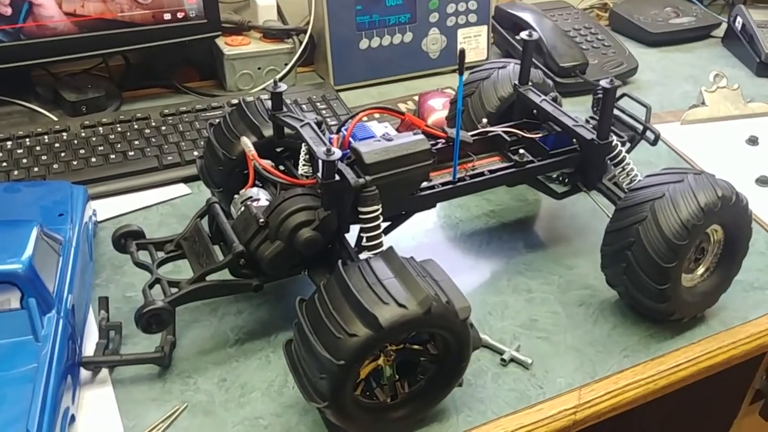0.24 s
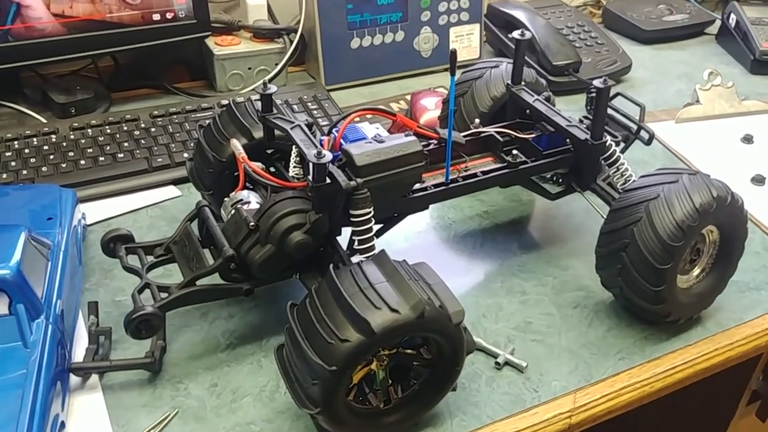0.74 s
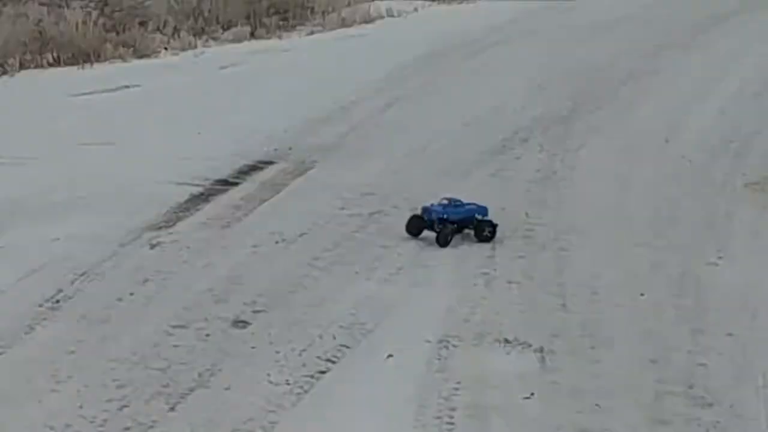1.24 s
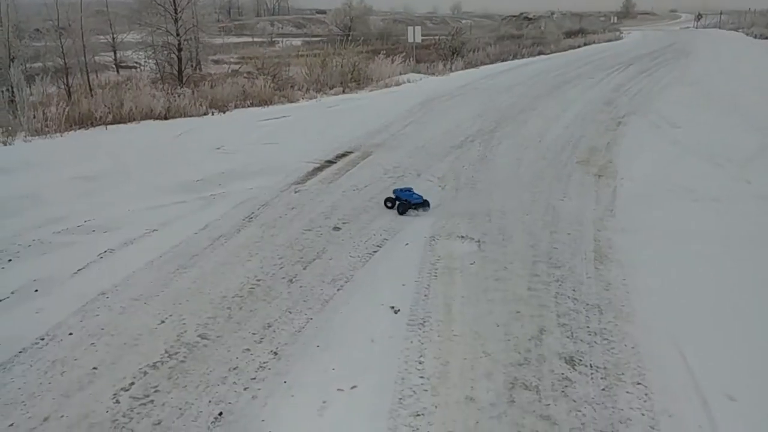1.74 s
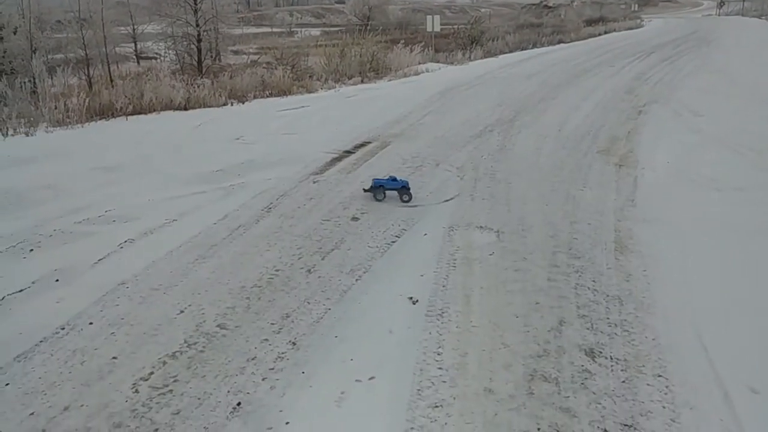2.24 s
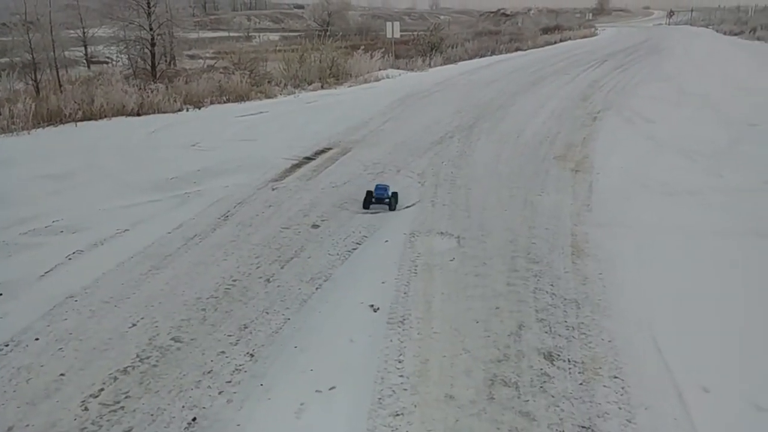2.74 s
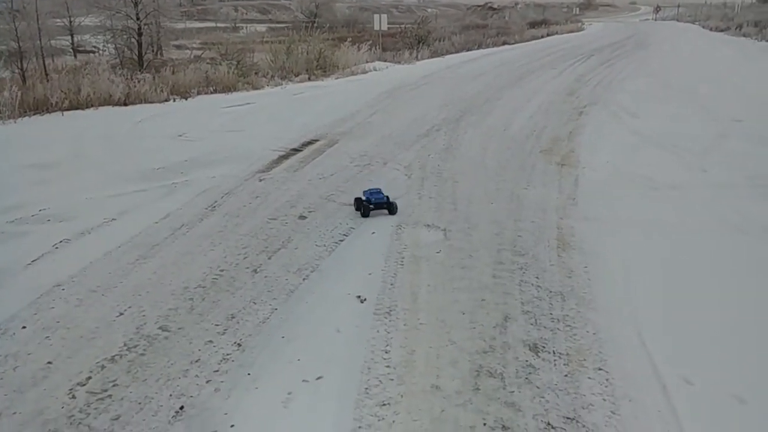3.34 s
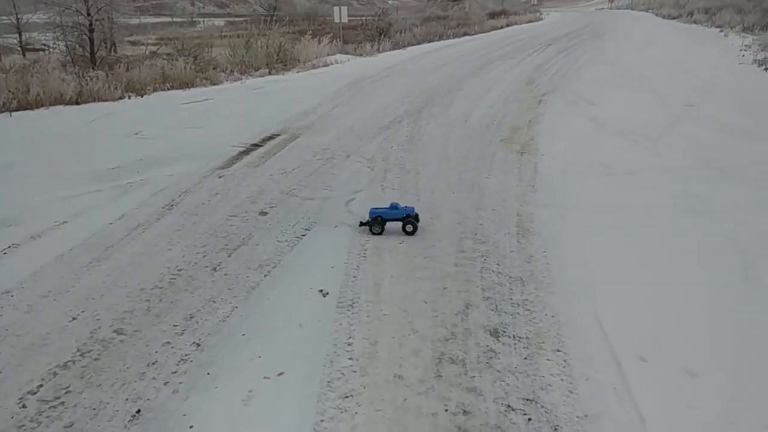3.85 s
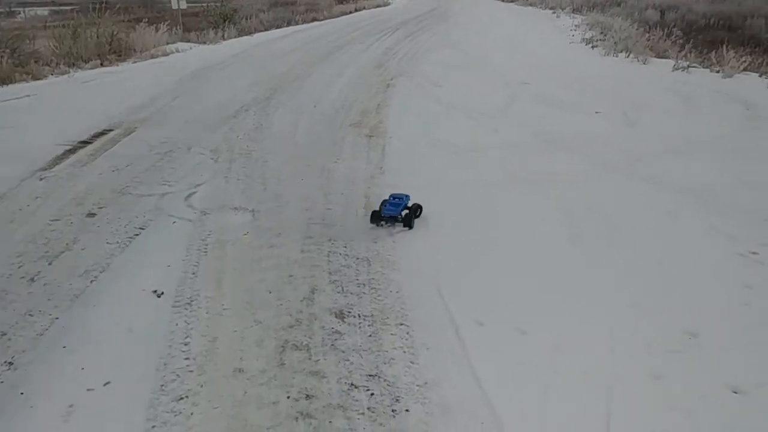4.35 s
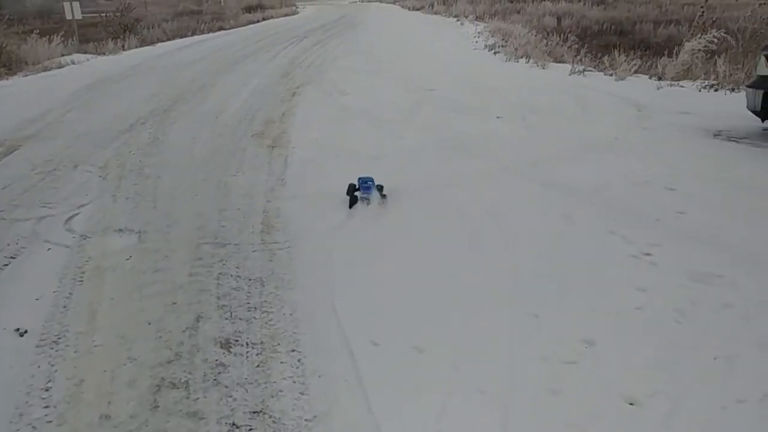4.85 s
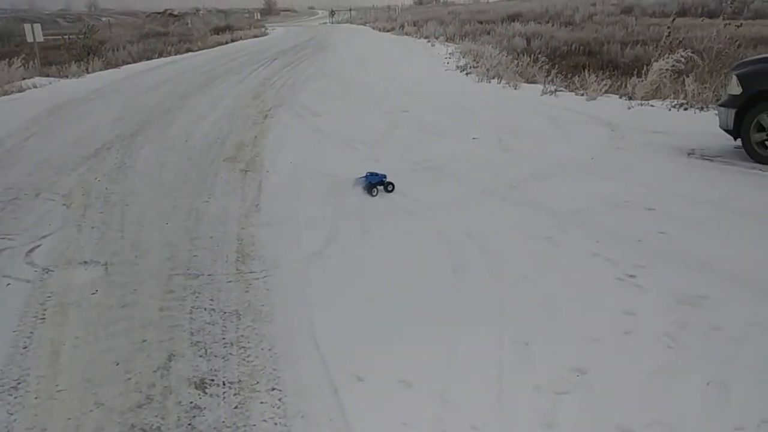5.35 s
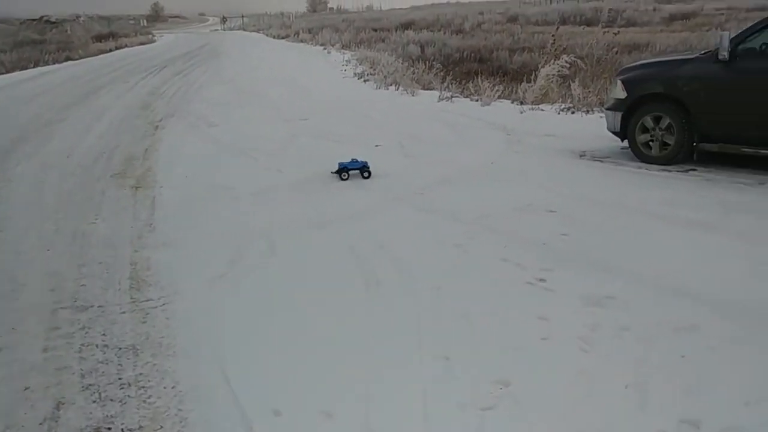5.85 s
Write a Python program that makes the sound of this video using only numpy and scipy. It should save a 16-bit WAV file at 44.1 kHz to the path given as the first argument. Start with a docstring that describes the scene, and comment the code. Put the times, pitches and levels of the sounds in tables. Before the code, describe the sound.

A small remote-controlled truck whines and rasps over snow in repeated throttle bursts, with a low engine idle and light wind rumble.

```python
"""A workshop hums around a radio-controlled truck on the bench, with a brief squeak and faint clicks.
Just before one second the scene changes to packed snow, where the truck races in bursts of throttle.
Its meshing gears whine and rasp in their plastic case; paddle tyres slap, churn and fling the snow,
and bumps set the shell drumming. All the while a parked pickup idles nearby and a little wind
rumbles on the microphone. Toward the end the truck slows and grows quieter."""
import sys
import numpy as np
from scipy import signal
from scipy.fft import rfft, irfft, next_fast_len
from scipy.io import wavfile
from scipy.ndimage import uniform_filter1d

SR = 44100
rng = np.random.default_rng(int(sys.argv[2]) if len(sys.argv) > 2 else 0)


def transcribe(u):
    """Save the signal u as a 16-bit wav file named by the first command-line argument.

    u: samples, shape (n,) or (channels, n), limited to [-1, 1]; the rate is SR.
    q: integer samples, one column per channel.
    """
    v = np.clip(np.atleast_2d(u).T, -1, 1)
    q = np.round(v * 32767).astype(np.int16)
    wavfile.write(sys.argv[1], SR, q)


N = 268172
TIME = np.arange(N) / SR
FFT_SIZE = next_fast_len(N + 4096, True)
FREQS = np.maximum(np.fft.rfftfreq(FFT_SIZE, 1 / SR), 1)


def from_db(db):
    """Amplitude grows tenfold for every 20 dB."""
    return 10 ** (np.asarray(db) / 20)


def rms_one(x):
    """Normalisation to unit power."""
    return x / np.sqrt(np.mean(x ** 2) + 1e-20)


def at_hz(points):
    """Interpolation of a spectrum on a log-frequency axis."""
    hz, value = np.transpose(points)
    return np.interp(np.log(FREQS), np.log(hz), value)


def lift_db(modes):
    """Resonance: each mode adds a Lorentzian peak or dip to a spectrum in dB."""
    return sum(db / (1 + (2 * (FREQS - hz) / width) ** 2) for hz, width, db in modes)


def filtered(x, response):
    """Linear filtering multiplies the spectrum by a frequency response."""
    return irfft(rfft(x, FFT_SIZE) * response, FFT_SIZE)[:N]


def coloured(x, spectrum_db):
    """Source and filter: an excitation takes on a spectrum, at unit power."""
    return rms_one(filtered(x, from_db(spectrum_db)))


def drift(rate_hz):
    """Low-passed noise gives a random fluctuation of unit spread."""
    pole = np.exp(-2 * np.pi * rate_hz * 16 / SR)  # one draw every 16 samples
    slow = signal.lfilter([1], [1, -2 * pole, pole * pole], rng.standard_normal(N // 16 + 1002))[1000:]
    return np.interp(np.arange(N) / 16, np.arange(len(slow)), rms_one(slow))


def grains(per_s, spread_db):
    """Shot noise: tiny impacts of uneven size at random times."""
    sizes = from_db(spread_db * np.minimum(rng.exponential(1, N), 4))
    return rms_one((rng.random(N) < per_s / SR) * sizes * rng.choice([-1, 1], N))


def angle(hz):
    """Phase is the integral of frequency."""
    return 2 * np.pi * np.cumsum(hz * np.ones(N)) / SR


def decays(rows, decay_s):
    """Damping: an envelope jumps at each (time [s], level [dB]) and falls exponentially."""
    return sum(from_db(db) * (TIME >= s) * np.exp(-np.abs(TIME - s) / decay_s) for s, db in rows)


def swells(rows, width_s):
    """A Gaussian pulse at each (time [s], height [dB])."""
    return sum(db * np.exp(-np.minimum(((TIME - s) / width_s) ** 2, 20)) for s, db in rows)


# tones of fans and transformers: (frequency [Hz], level [dB])
HUM_TONES = [(43.1, -65), (231.5, -60.5), (328.4, -67), (823.6, -74.5)]
# spectrum of the moving air: (frequency [Hz], relative level [dB])
AIR_SPECTRUM = [(25,-22),(60,1.5),(150,0.5),(330,0.5),(480,-9.5),(820,-10.5),(1100,-14),(2400,-23),(3100,-22),(5000,-31.5),(9000,-51),(15000,-60)]
def workshop(air_db=-60, waver_db=1.5):
    """Periodic sources give line spectra: fans and transformers hum over broadband air noise."""
    hum = 0
    for hz, db in HUM_TONES:
        amplitude = np.sqrt(2) * from_db(db + waver_db * drift(7.1))
        hum += amplitude * np.sin(angle(hz * (1 + 0.0019 * drift(2.9))))
    return hum + from_db(air_db) * coloured(rng.standard_normal(N), at_hz(AIR_SPECTRUM))


def squeak(start_hz=3550, end_hz=3050, length_s=0.055, level_db=-51, roughness=0.089):
    """Random frequency modulation roughens a short falling tone on the bench."""
    pitch = np.interp(TIME, [0, length_s], [start_hz, end_hz]) * (1 + roughness * drift(460))
    return from_db(level_db) * np.exp(-(TIME / length_s) ** 4) * np.sin(angle(pitch))


# sharp plastic clicks: (time [s], relative level [dB])
CLICKS = [(0.036,-54),(0.064,-63),(0.525,-64),(1.025,-36.5),(1.902,-23.5),(4.133,-48)]
# spectrum of a click: (frequency [Hz], relative level [dB])
CLICK_SPECTRUM = [(400,4.5),(2000,-1),(3300,-3),(5000,-4.5),(6500,-2.5),(8500,-13),(11000,-29),(15000,-24)]
def clicks(decay_s=0.012, gain_db=1.0):
    """A brief impact has a broad spectrum: plastic clicks as quickly damped noise."""
    impacts = decays(CLICKS, decay_s) * rng.standard_normal(N)
    return from_db(gain_db) * filtered(impacts, rms_one(from_db(at_hz(CLICK_SPECTRUM))))


def outdoors(start_s=0.97, fade_s=0.15, start_db=-13):
    """Onset envelope of the snow scene: zero at first, then a quick rise, linear in decibels."""
    return (TIME > start_s) * from_db(start_db * np.clip(1 - (TIME - start_s) / fade_s, 0, 1))


# the motor revs and runs down: (time [s], tooth-mesh rate [Hz], relative whine level [dB])
MOTOR = [(1.0, 4060, -44.5), (1.221, 3978, -44), (1.285, 3850, -51), (1.312, 3480, -39), (1.336, 3200, -69),
         (1.379, 2870, -46), (1.42, 2470, -58), (1.478, 2130, -49.5), (1.519, 3014, -34),
         (1.56, 3630, -44.5), (1.62, 3904, -45.5), (1.71, 3877, -40.5), (1.785, 3396, -42),
         (1.814, 3224, -65), (1.86, 3358, -34), (1.93, 2680, -54.5), (1.98, 2298, -37),
         (2.031, 2270, -37.5), (2.081, 2928, -34), (2.111, 3317, -35), (2.17, 3813, -50),
         (2.291, 3933, -44), (2.328, 3310, -57), (2.409, 2993, -56), (2.451, 2300, -38.5),
         (2.49, 2106, -42.5), (2.515, 1910, -43), (2.591, 1848, -60), (2.67, 2053, -45.5),
         (2.699, 1800, -48), (2.726, 1696, -36.5), (2.76, 1496, -51), (2.79, 1423, -36.5),
         (2.83, 1294, -46.5), (2.871, 1374, -43), (2.919, 1270, -43.5), (2.975, 1360, -47),
         (3.01, 1199, -50.5), (3.051, 1152, -61.5), (3.16, 1152, -64), (3.18, 1111, -44.5),
         (3.205, 1089, -48), (3.225, 1345, -48), (3.255, 1932, -43), (3.29, 2436, -51),
         (3.366, 3227, -38.5), (3.4, 3268, -46), (3.44, 3553, -50.5), (3.49, 3290, -38.5),
         (3.531, 3068, -42), (3.575, 2420, -44), (3.61, 2078, -47), (3.686, 1748, -50),
         (3.725, 1970, -39.5), (3.759, 2080, -41), (3.816, 2578, -34.5), (3.851, 2982, -43),
         (3.896, 3322, -42), (3.93, 2772, -40.5), (4, 2906, -38), (4.051, 2938, -47), (4.09, 3305, -42),
         (4.248, 3561, -58), (4.351, 3266, -38.5), (4.39, 2870, -34.5), (4.46, 2830, -43.5),
         (4.519, 2488, -49), (4.59, 2132, -46.5), (4.62, 1997, -41), (4.661, 1604, -36.5),
         (4.72, 1585, -36.5), (4.74, 1854, -47), (4.76, 2283, -47), (4.785, 2776, -38.5), (4.82, 3068, -41),
         (4.88, 3082, -36.5), (4.93, 3244, -37.5), (5.0, 3313, -41.5), (5.072, 2870, -38.5),
         (5.251, 2640, -47), (5.31, 2550, -36.5), (5.34, 2500, -47.5), (5.382, 2536, -42),
         (5.42, 2366, -37), (5.446, 2393, -63), (5.468, 2480, -42), (5.5, 2064, -49), (5.57, 2070, -57.5),
         (5.625, 1915, -50), (5.668, 1930, -65), (5.76, 1722, -60.5), (5.829, 1610, -48.5),
         (5.869, 1615, -78), (5.951, 1957, -69.5), (6.019, 1570, -42), (6.08, 1570, -52)]
def motor():
    """Gear tone follows shaft speed: the tooth-mesh rate and the whine's level through time."""
    s, mesh_hz, whine_db = np.transpose(MOTOR)
    return np.interp(TIME, s, mesh_hz), np.interp(TIME, s, whine_db)


# bursts of throttle, with relative levels at the speed reached: (pressed [s], released [s],
# rasp [dB], churn [dB], spray [dB], top hiss [dB], whine's second harmonic against its first [dB])
THROTTLE = [(0.6, 1.258, -35.5, -27.5, -38, -66.5, -18.5), (1.503, 1.72, -48, -26, -25.5, -47, -14),
            (1.727, 1.9, -27.5, -24, -32, -60, -2), (1.976, 2.039, -31.5, -26.5, -47, -86, 5.5),
            (2.05, 2.272, -32.5, -24, -27.5, -67, -4), (2.555, 2.71, -43.5, -33, -49, -93, -5.5),
            (2.738, 2.992, -52.5, -35.5, -49.5, -98, -14), (3.02, 3.194, -61, -56, -63, -84, -15.5),
            (3.185, 3.475, -33.5, -30.5, -41.5, -79, -4.5), (3.69, 3.827, -37, -41, -40, -80.5, -4.5),
            (3.811, 3.889, -56, -28, -40.5, -60, -12.5), (3.945, 4.05, -56.5, -26.5, -21.5, -61.5, -8.5),
            (4.046, 4.321, -28.5, -28.5, -39.5, -55.5, -7), (4.393, 4.472, -33.5, -38.5, -20.5, -69, -8),
            (4.616, 4.712, -40.5, -57, -53.5, -81, -7), (4.728, 4.98, -34, -47.5, -33, -62.5, -1),
            (5.036, 5.27, -39.5, -53, -35.5, -71, -4), (5.3, 5.47, -44, -45.5, -74, -77, -8),
            (5.565, 5.821, -50, -59, -70, -83, -1.5), (5.885, 5.943, -45.5, -51.5, -62, -88, -0.5)]
def current_burst():
    """A step function: the index of the burst of throttle in force at each moment."""
    return np.maximum(np.searchsorted(np.array(THROTTLE)[:, 0], TIME) - 1, 0)


# how rasp, churn, spray and top hiss answer the drive, a row each:
# (growth with speed [dB/octave], gain under full strain [dB], loss when freewheeling [dB])
DRIVE_RESPONSE = [(10, -4.5, 0), (12, 9.5, -0.5), (14, 8, 16), (16, 12.5, 0)]
FULL_SPEED_HZ = 4000  # tooth-mesh rate
def drive_levels(mesh_hz, glide_s=0.055):
    """Machine noise depends on speed and load: levels of rasp, churn, spray and top hiss in dB."""
    _, released, *strengths, _ = np.transpose(THROTTLE)
    reached_hz = np.interp(released, TIME, mesh_hz)
    burst = current_burst()
    coasting = TIME > released[burst]
    strain = ~coasting * np.clip(2 * (1 - mesh_hz / reached_hz[burst]), 0, 1)  # the motor catches up
    pole = np.exp(-1 / (glide_s * SR))
    levels = []
    for strength_db, (growth_db, strain_db, coast_db) in zip(strengths, DRIVE_RESPONSE):
        full_speed_db = (strength_db - growth_db * np.log2(reached_hz / FULL_SPEED_HZ))[burst]
        target_db = full_speed_db + strain_db * strain - coast_db * coasting
        load_db = signal.lfilter([1 - pole], [1, -pole], target_db)
        levels.append(load_db + growth_db * np.log2(mesh_hz / FULL_SPEED_HZ))
    return levels


def chassis(x, ring_s=0.007, share=0.55):
    """Dense modes store a share of the energy and ring briefly, smearing a glide; the rest passes on."""
    impulse = rng.standard_normal(N) * np.exp(-np.minimum(TIME / ring_s, 20))
    ringing = signal.fftconvolve(x, impulse / np.linalg.norm(impulse))[:N]
    return np.sqrt(1 - share) * x + np.sqrt(share) * ringing


# radiation of the gear case: (frequency [Hz], gain [dB])
CASE_RESPONSE = [(1050,5.5),(1380,4),(1560,-13),(1850,-11),(2200,2.5),(2900,2.5),(3300,1.5),(3900,0),(4400,-8),(5300,-18),(6200,-2.5),(7000,-17.5),(7750,7),(8400,2.5),(9200,-7.5),(10500,-39.5)]
# sharp modes of the motor can and gear case: (frequency [Hz], width [Hz], gain [dB])
MOTOR_MODES = [(3364,260,4.5),(6116,56,5),(6730,28,6.5),(7550,60,4),(7670,57,11),(8140,100,6.5)]
def gear_whine(mesh_hz, level_db, teeth=19, wobble=0.19, looseness=0.75, rattle_hz=320, gain_db=2.5):
    """Forced vibration: meshing teeth make a rough tone that flares as it crosses the case's modes."""
    mesh = angle(mesh_hz * (1 + 0.008 * drift(73.0) + 0.006 * drift(14.3)))  # jitter and lurch
    shaft = mesh / teeth  # the off-centre pinion adds sidebands
    backlash = looseness * mesh_hz / mesh_hz.mean()  # faster teeth rattle more
    second_db = uniform_filter1d(np.array(THROTTLE)[current_burst(), -1], size=1024)
    tone = 0
    for k, harmonic_db in enumerate((0, second_db, second_db - 17.5), 1):
        rattle = backlash / np.sqrt(k) * (drift(rattle_hz) + 1j * drift(rattle_hz))
        stutter = from_db(4.0 * drift(28))
        load = (1 + wobble * np.sin(shaft + k) + rattle) * stutter
        tone += from_db(harmonic_db) * rms_one(np.real(load * np.exp(1j * k * mesh)))
    radiation = from_db(at_hz(CASE_RESPONSE) + lift_db(MOTOR_MODES))
    return chassis(filtered(from_db(level_db + gain_db) * tone, radiation))


# spectrum of tooth chatter: (frequency [Hz], relative level [dB])
RASP_SPECTRUM = [(900,-15.5),(1900,-15.5),(2600,10),(3300,7.5),(3700,-0.5),(4300,3),(5200,-9.5),(6300,-1),(8500,-12),(10000,-76.5)]
# modes of the body shell: (frequency [Hz], width [Hz], gain [dB])
SHELL_MODES = [(429,80,8),(516,97,5.5),(909,110,-5),(1050,48,2),(1620,68,-7.5),(1798,270,8),(2010,120,-8.5),(2183,550,6.5),(2443,110,-5),(3620,82,-0.5),(3830,80,6)]
def gear_rasp(mesh_hz, level_db, teeth=19, throb=0.064, flutter_db=1.5, gain_db=-7.0):
    """Amplitude-modulated impact noise: loose teeth chatter, hardest once in each motor turn."""
    load = (1 + throb * np.sin(angle(mesh_hz / teeth))) * from_db(flutter_db * drift(19))
    spectrum_db = at_hz(RASP_SPECTRUM) + lift_db(MOTOR_MODES) + lift_db(SHELL_MODES)
    return from_db(level_db + gain_db) * coloured(load * grains(8000, 3.1), spectrum_db)


# crushed snow, spray hiss and a thin top hiss at 14-16 kHz: (frequency [Hz], relative level [dB])
CHURN_SPECTRUM = [(60,-7.5),(170,-4),(300,-1.5),(550,-1.5),(800,-5),(1200,-6),(1550,-14.5),(2400,-16),(4000,-27),(5300,-30.5),(8000,-49.5),(10000,-83)]
SPRAY_SPECTRUM = [(2500,-38),(5300,-12),(6300,11.5),(7000,11),(8100,14.5),(9000,2),(10000,-43),(14000,-37)]
TOP_HISS_SPECTRUM = [(9000,-44.5),(12000,-30),(14000,-1),(15600,5)]
# the tyres skip and briefly lose the snow: (time [s], loss of churn, slap and spray [dB])
SKIPS = [(1.94, 1.5), (3.08, 5), (3.68, 4), (4.07, 14), (4.92, 20)]
# the paddles dig into firmer snow: (time [s], change in churn and slap [dB])
BITES = [(1.56, 0), (2.38, 4), (2.54, 2.5), (2.65, 1.5), (2.73, 3.5), (3.27, 1.5), (3.39, 3.5),
         (3.86, -3.5), (4.14, 3)]
def tyres(mesh_hz, churn_db, spray_db, top_hiss_db, meshes_per_paddle=24.9, half_width_s=0.023):
    """Periodic impact and shot noise: paddles slap, crush and spray snow; a thin hiss flickers on top."""
    skip_db = swells(SKIPS, half_width_s)
    contact_db = churn_db - skip_db + swells(BITES, half_width_s)
    paddle = angle(mesh_hz / meshes_per_paddle * (1 + 0.0096 * drift(23)))
    grip = (1 + 0.047 * np.cos(paddle)) * from_db(1.73 * drift(39))  # paddle beat on lumpy snow
    churn = coloured(grip * grains(4000, 1.58), at_hz(CHURN_SPECTRUM) + lift_db(SHELL_MODES))
    spray = coloured(grip * grains(3000, 2.0), at_hz(SPRAY_SPECTRUM) + lift_db(MOTOR_MODES))
    top_hiss = coloured(grains(9000, 2.5) * from_db(3.8 * drift(20)), at_hz(TOP_HISS_SPECTRUM))
    note = np.sin(paddle) + from_db(-9.0) * np.sin(2 * paddle) + from_db(-11.5) * np.sin(3 * paddle)
    slap = rms_one(note * from_db(0.67 * drift(22)))
    slap_db = contact_db - 4 + 3.5 * np.log2(mesh_hz / FULL_SPEED_HZ)  # gains on the churn with speed
    crushed = from_db(contact_db + 0.5) * churn + from_db(slap_db) * slap
    hiss = from_db(spray_db - skip_db - 16) * spray + from_db(top_hiss_db + 11) * top_hiss
    return crushed + hiss


# harmonics of the idling V8: (order [multiple of crank rate], level [dB])
ENGINE_ORDERS = [(2,-39.5),(3,-37),(4,-54.5),(5,-59),(6,-51),(10,-71)]
def pickup(crank_hz=45.3, waver_db=3.5):
    """A harmonic series: the uneven exhaust pulses of an idling V8 give wavering engine orders."""
    crank = angle(crank_hz * (1 + 0.00833 * drift(5.1)))
    exhaust = 0
    for order, db in ENGINE_ORDERS:
        amplitude = np.sqrt(2) * from_db(db + waver_db * drift(17.0))
        exhaust += amplitude * np.sin(order * crank + rng.uniform(0, 2 * np.pi))
    return exhaust


# spectrum of the eddies: (frequency [Hz], relative level [dB])
WIND_SPECTRUM = [(20,-11),(38,-26),(60,3),(100,4),(160,-3),(240,-5.5),(350,-18.5),(700,-31.5),(2000,-32),(8000,-57),(16000,-112)]
# gusts: (time [s], half-width [s], relative left level [dB], relative right level [dB])
GUSTS = [(1.45, 0.24, -27.5, -54), (1.868, 0.025, -33, -21), (2.3, 0.46, -42, -39),
         (2.899, 0.19, -33.5, -30.5), (3.34, 0.11, -25.5, -26.5), (3.55, 0.15, -36, -36.5),
         (3.989, 0.29, -34.5, -32), (4.25, 0.3, -30.5, -43), (5.08, 0.076, -33, -43), (5.5, 0.1, -35, -47)]
def wind(breeze_db=(-32.5, -36.5), shared=0.66, gain_db=-4.0):
    """Turbulent pressure rumbles at the microphone; breeze and gusts catch its two ports unequally."""
    both, left, right = [coloured(rng.standard_normal(N), at_hz(WIND_SPECTRUM)) for _ in range(3)]
    eddies = np.array([shared * both + left, shared * both + right])
    strength = from_db(breeze_db)[:, None]
    for s, width, *port_db in GUSTS:
        strength = strength + from_db(port_db)[:, None] * np.exp(-((TIME - s) / width) ** 2)
    return from_db(gain_db) * strength * eddies


# dull bumps: (time [s], thump level [dB], relative shell level [dB])
BUMPS = [(1.025, -38, -14.5), (1.443, -17, -29.5), (1.683, -37.5, -6.5), (1.838, -25.5, -12.5),
         (2.073, -35.5, -8.5), (3.25, -29, -13.5), (4.372, -39, -10.5), (5.006, -23, -20),
         (5.377, -20.5, -45)]
def bumps(thump_hz=70, thump_decay_s=0.024, shell_decay_s=0.022, shell_gain_db=-15):
    """Damped oscillation: each bump rings for a few low cycles and excites the modes of the shell."""
    thumps = 0
    for s, db, _ in BUMPS:
        thumps += decays([(s, db)], thump_decay_s) * np.sin(2 * np.pi * thump_hz * (TIME - s))
    shaking = decays([(s, db) for s, _, db in BUMPS], shell_decay_s) * rng.standard_normal(N)
    shell_response = rms_one(from_db(at_hz(CHURN_SPECTRUM) + lift_db(SHELL_MODES)))
    return thumps + from_db(shell_gain_db) * filtered(shaking, shell_response)


def sound_field(bench_end_s=0.89):
    """Superposition of the sources: the bench, a moment of silence, then the snow."""
    mesh_hz, whine_db = motor()
    rasp_db, *tyre_db = drive_levels(mesh_hz)
    truck = gear_whine(mesh_hz, whine_db) + gear_rasp(mesh_hz, rasp_db) + tyres(mesh_hz, *tyre_db)
    bench = (workshop() + squeak()) * (TIME < bench_end_s)
    return bench + (truck + pickup()) * outdoors() + bumps() + clicks()


# level difference between the channels: (frequency [Hz], left minus right [dB])
CHANNEL_BALANCE = [(60,8.1),(200,5.1),(430,10.7),(700,5.4),(1400,5.1),(2400,10.8),(4000,15.4),(8000,13),(15000,44)]
# likeness of the channels: (frequency [Hz], coherence [0 to 1])
CHANNEL_COHERENCE = [(50,1),(150,0.87),(600,1),(1200,0.48),(3000,0.2),(8000,0.97),(15000,.2)]
def stereo(direct, scattered, lag_s=0.00022):
    """Time and level differences: the right channel is later and duller, with almost no top treble."""
    coherence = np.clip(at_hz(CHANNEL_COHERENCE), 0, 1)
    right_to_left = from_db(-at_hz(CHANNEL_BALANCE))
    left_gain = 2 / (1 + right_to_left)
    right_gain = left_gain * right_to_left
    delay = np.exp(-2j * np.pi * FREQS * lag_s)
    right = filtered(direct, right_gain * coherence * delay)
    right += filtered(scattered, right_gain * np.sqrt(1 - coherence ** 2))
    return np.array([filtered(direct, left_gain), right])


def scene():
    """Direct and scattered fields combine in stereo, and outdoors the wind adds its pressure."""
    return stereo(direct=sound_field(), scattered=sound_field()) + wind() * outdoors()


def record(dry, bass_cut_hz=44, treble_cut_hz=15900):
    """Band limiting: the deep bass rolls off and the top is cut steeply."""
    thinned = signal.sosfilt(signal.butter(4, bass_cut_hz, "high", fs=SR, output="sos"), dry)
    low_pass = 1 / (1 + (FREQS / treble_cut_hz) ** 160)
    return np.array([filtered(channel, low_pass) for channel in thinned])


dry = scene()
out = record(dry)
transcribe(out)
```